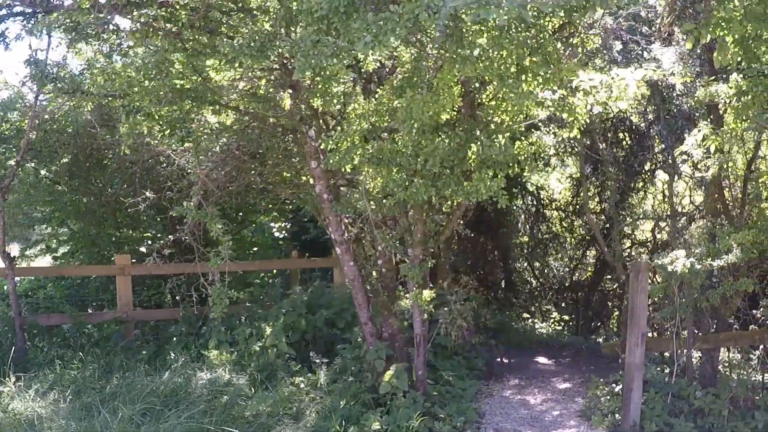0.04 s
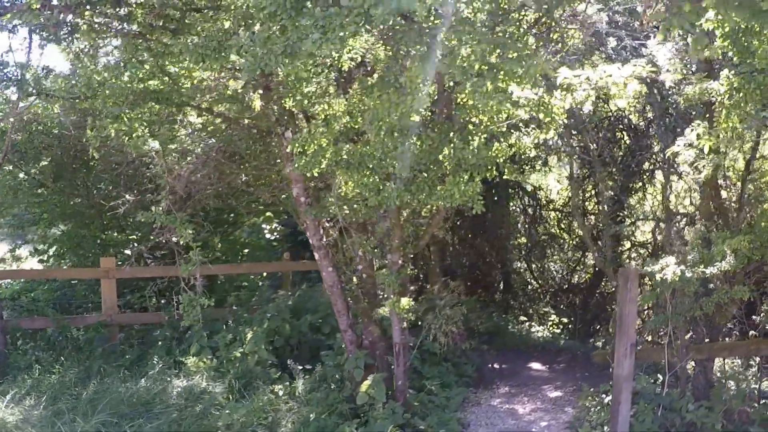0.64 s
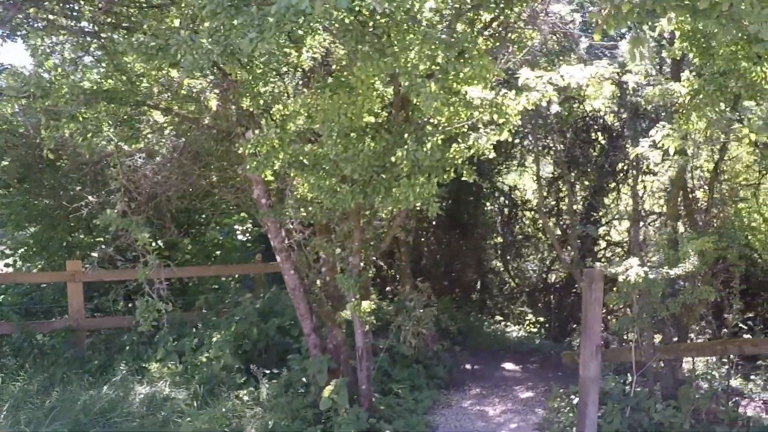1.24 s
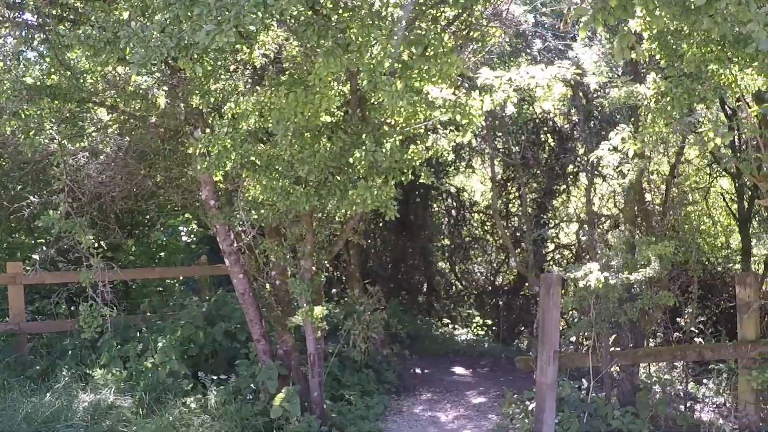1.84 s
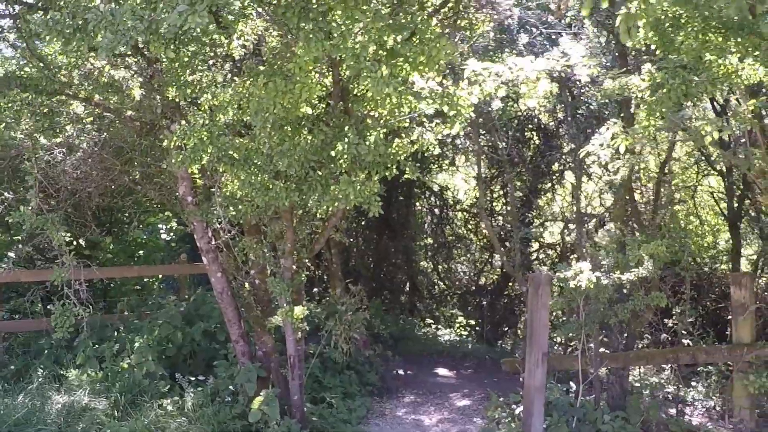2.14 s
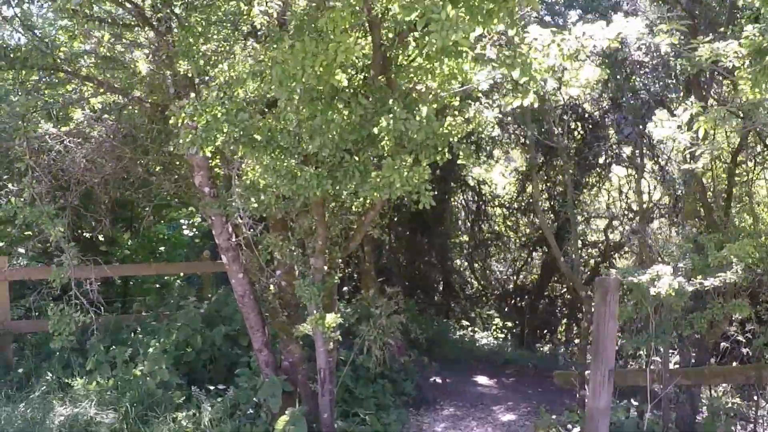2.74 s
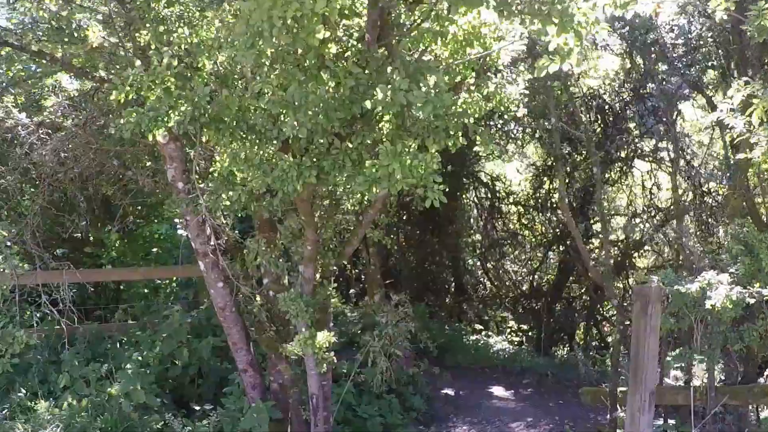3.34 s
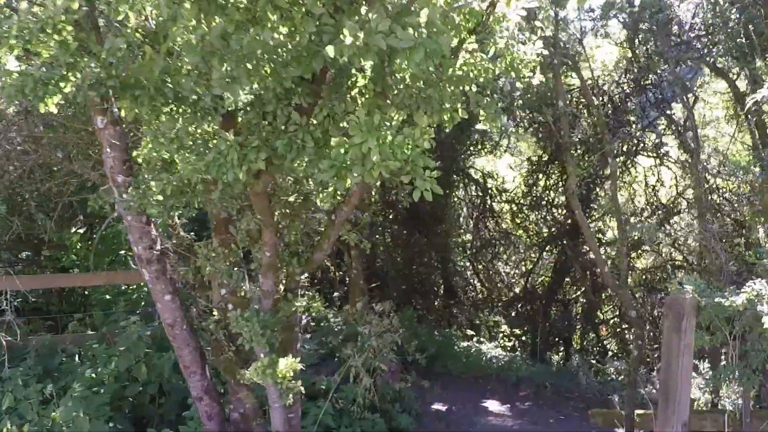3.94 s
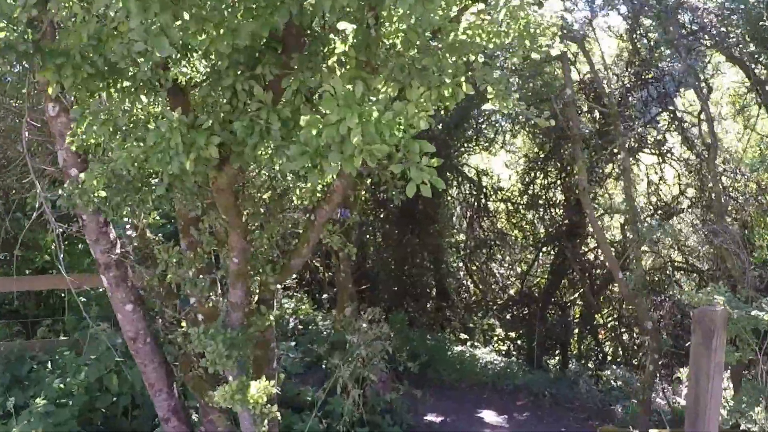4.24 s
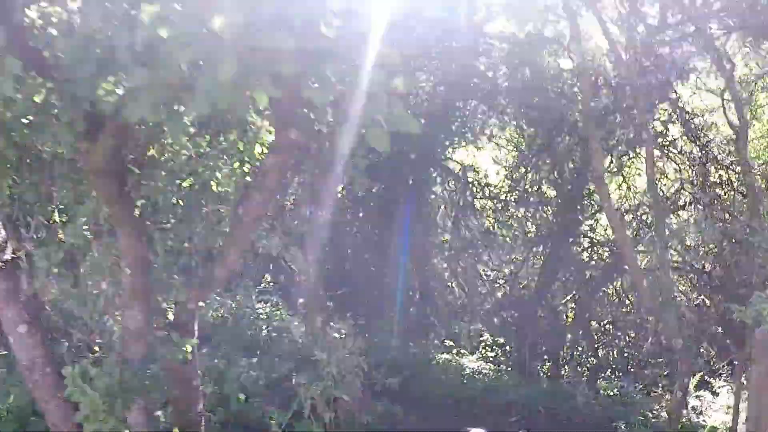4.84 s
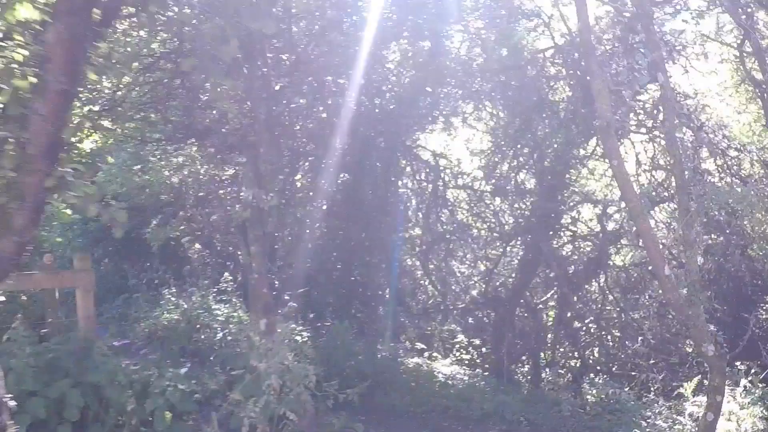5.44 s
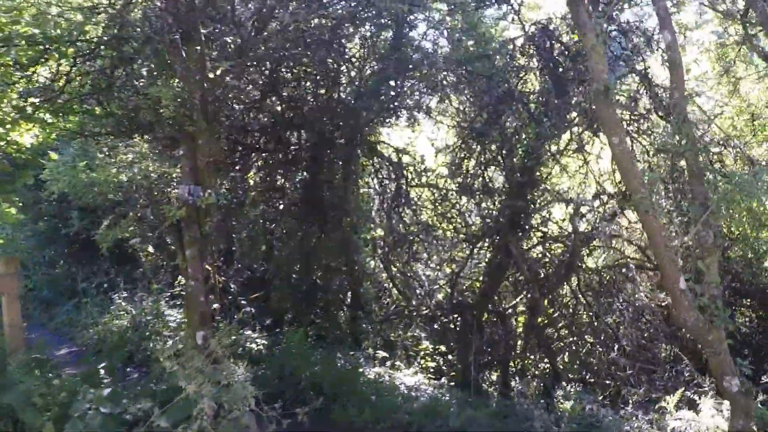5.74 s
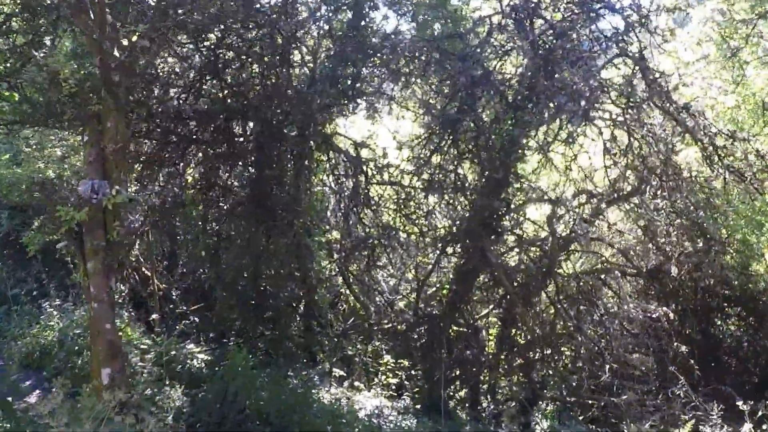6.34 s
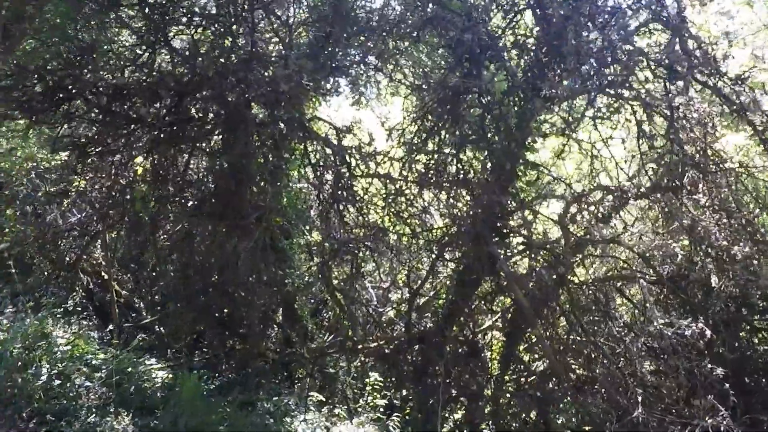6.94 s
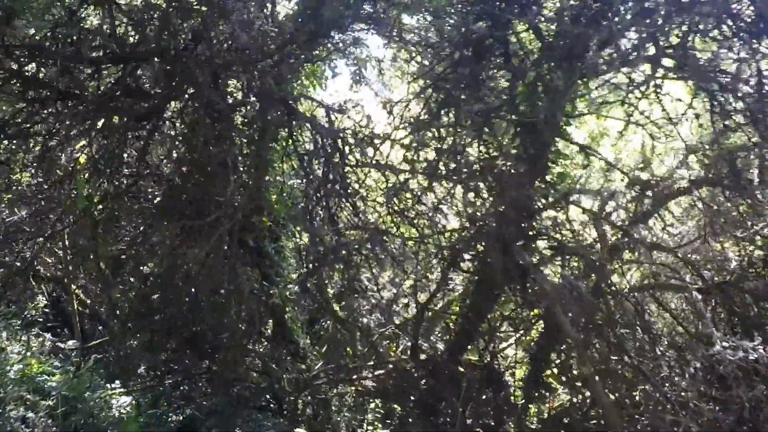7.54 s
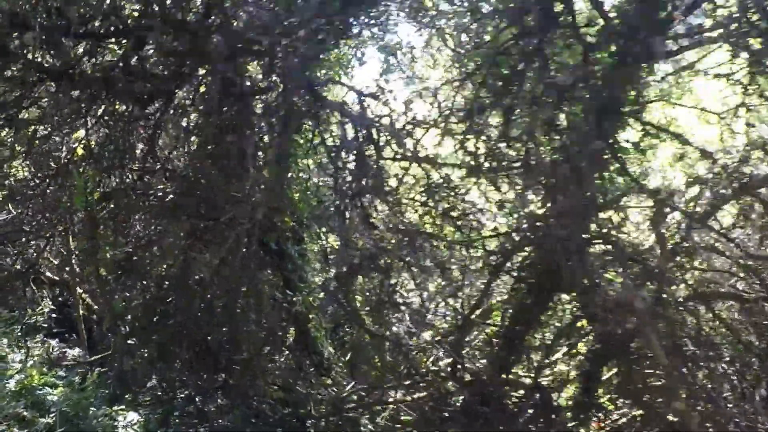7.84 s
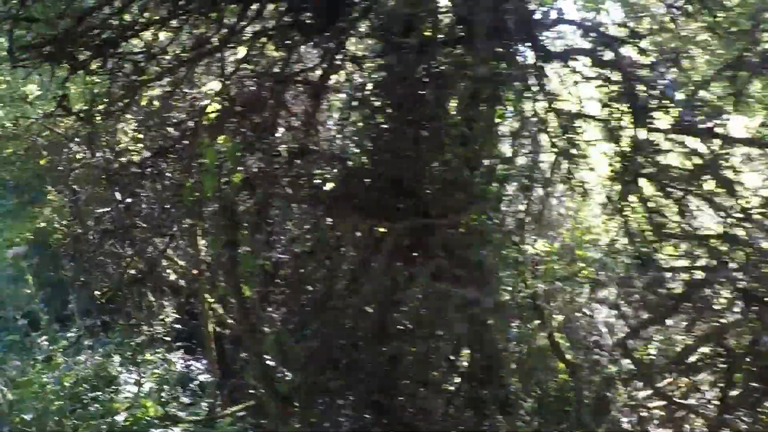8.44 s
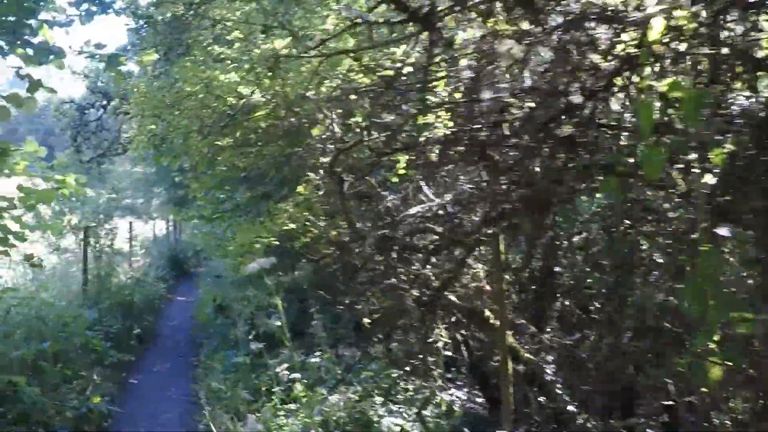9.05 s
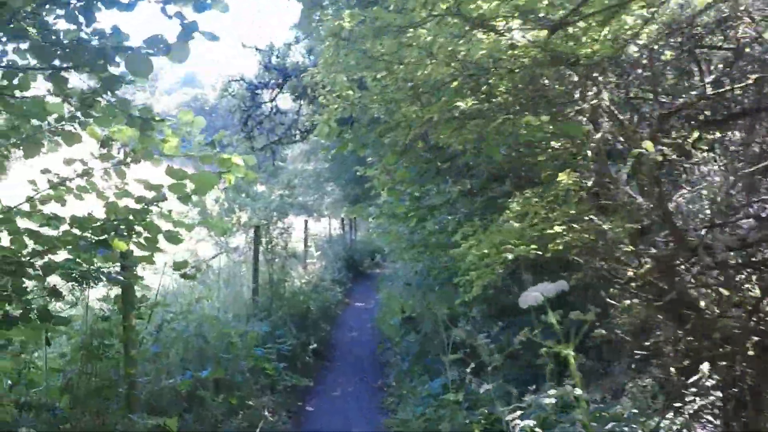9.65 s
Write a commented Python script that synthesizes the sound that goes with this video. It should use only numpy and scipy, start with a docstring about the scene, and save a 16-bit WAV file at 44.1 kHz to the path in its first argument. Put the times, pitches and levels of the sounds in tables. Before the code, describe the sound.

A bicycle rolls along a gravel and dirt path under trees, heard from a camera on board. The mount rumbles steadily, the tyres crunch grit and loose parts clack at bumps. Leaves brush past a few times and small birds whistle thinly. Midway the ground gets looser and stones snap and spit grit, then a gust thumps the microphone. The ride continues on packed ground with fewer clacks.

```python
"""A bicycle with a camera on board rolls along a gravel and dirt path under trees.
From the start the camera mount rumbles, the tyres crunch grit and loose parts clack at bumps.
Soon leaves brush past and small birds whistle thinly; both return later, and a few faint squeaks sound.
Midway the path gets looser and pinched stones spit grit. Near 5.5 s a gust thumps the microphone.
Then the path is packed again, and the ride goes on with fewer clacks."""
import sys
import numpy as np
from scipy import signal
from scipy.fft import rfft, irfft, next_fast_len
from scipy.io import wavfile
from scipy.ndimage import uniform_filter1d, map_coordinates

SR = 44100
rng = np.random.default_rng(int(sys.argv[2]) if len(sys.argv) > 2 else 0)


def unload_wav(signal):
    """Save mono or channel-first audio to the path in sys.argv[1] as 16-bit WAV at rate SR, clipped to [-1, 1]."""
    wavfile.write(
        sys.argv[1],
        SR,
        np.round(np.clip(np.atleast_2d(signal).T, -1, 1) * 32767).astype(np.int16),
    )


N = 426888  # samples, about 9.7 s


def amp(db):
    """Turn decibels into a gain; amp(-60 * t / fade_s) drops 60 dB in fade_s seconds."""
    return 10 ** (np.asarray(db) / 20)


def unit(x):
    """Scale a signal to an average strength (rms) of 1."""
    return x / np.sqrt(np.mean(x ** 2) + 1e-20)


def curves(rows):
    """Join rows of (time_s, values...) with straight lines: one curve for each value column."""
    times, *columns = np.transpose(rows)
    return [np.interp(np.arange(N) / SR, times, column) for column in columns]


def wobble(rate):
    """A smooth random curve through `rate` new values a second."""
    return map_coordinates(rng.standard_normal(int(N * rate / SR) + 4), [np.arange(N) * rate / SR])


def swell(middle_s, length_s):
    """A gain that rises and falls in a bell shape."""
    return np.exp(-np.minimum((2 * (np.arange(N) / SR - middle_s) / length_s) ** 2, 20))


def add(track, start_s, sound):
    """Mix a sound into the track."""
    room_left = track[max(round(start_s * SR), 0):][:len(sound)]
    room_left += sound[:len(room_left)]


def colour(x, spectrum, size=16384):
    """Shape the tone with a filter that follows rows of (frequency_hz, gain_db)."""
    hz, db = np.transpose(spectrum)
    gain = amp(np.interp(np.log(np.fft.rfftfreq(size, 1 / SR) + 1), np.log(hz), db))
    cepstrum = irfft(np.log(gain))
    cepstrum[1:size // 2] *= 2
    cepstrum[size // 2 + 1:] = 0  # so the filter rings only after a hit, never before
    return signal.fftconvolve(x, irfft(np.exp(rfft(cepstrum))))[:len(x)]


def noise(spectrum):
    """Steady noise with the given tone."""
    return unit(colour(rng.standard_normal(N + SR // 2), spectrum)[-N:])


def band(hz, width_hz):
    """Noise that rings around one pitch."""
    resonance = signal.iirpeak(hz, hz / width_hz, SR)
    return unit(signal.lfilter(*resonance, signal.lfilter(*resonance, rng.standard_normal(N))))


def grains(spectrum, rate, spread_db, bed_db):
    """Tiny hits of uneven size, `rate` a second, over a hissing bed of countless finer ones."""
    struck = rng.random(N) < rate / SR
    sizes = amp(spread_db * np.minimum(rng.standard_normal(N), 2)) * rng.choice([-1, 1], N)
    return unit(colour(unit(struck * sizes) + amp(bed_db) * rng.standard_normal(N), spectrum))


def patchy(x, depth_db):
    """Let the tone drift at random, in patches about 700 Hz wide and 60 ms long."""
    slices = signal.stft(x, nperseg=512)[2]
    drift = uniform_filter1d(rng.standard_normal(slices.shape), size=8, axis=0)
    drift = uniform_filter1d(drift, size=10, axis=1)
    return unit(signal.istft(slices * amp(depth_db * unit(drift)))[1][:N])


def birds():
    """Thin whistles glide and flutter; the farther the bird, the more the trees smear its note."""
    # whistles: start_s, length_s, start_hz, middle_hz, end_hz, level_db, direct_share (0-1)
    whistles = [(1.1, 0.12, 4150, 3680, 3980, -57, 0.1), (1.195, 0.11, 3500, 4030, 4760, -54, .05),
                (1.3, .1, 4770, 4170, 3600, -60, .05), (2.72, .1, 4200, 4700, 5300, -56, .35),
                (2.838, 0.071, 4180, 4700, 5280, -50, .6), (2.97, .09, 4270, 4830, 5400, -52, 0.66),
                (3.039, 0.34, 7800, 8140, 7840, -49, .6), (7.656, 0.3, 7880, 8100, 7930, -58, 0.6)]
    direct, scattered, t = np.zeros(N), np.zeros(N), np.arange(SR // 2) / SR
    quaver_hz = 170 * wobble(150)
    for start_s, length_s, start_hz, middle_hz, end_hz, level_db, direct_share in whistles:
        progress = np.linspace(0, 1, int(length_s * SR))
        hz = np.polyval(np.polyfit([0, .5, 1], [start_hz, middle_hz, end_hz], 2), progress)
        hz += (1 - direct_share) * quaver_hz[round(start_s * SR):][:len(hz)]
        arch = np.sqrt(np.abs(np.sin(np.pi * progress)))
        note = amp(level_db) * arch * np.sin(2 * np.pi * np.cumsum(hz) / SR)
        add(direct, start_s, direct_share * note)
        add(scattered, start_s, (1 - direct_share) * note)
    trees = rng.standard_normal(len(t)) * amp(-60 * t / .5)
    echo = signal.fftconvolve(scattered, trees / np.linalg.norm(trees))[:N]
    return direct * amp(2.7 * wobble(32)) + echo


def squeaks():
    """Short breathy notes, each a swell of noise around one high pitch."""
    # squeaks: middle_s, level_db, pitch_hz, width_hz, length_s
    notes = [(2.148, -48.5, 6100, 1300, 0.04), (6.441, -44, 4120, 400, 0.022),
             (9.442, -52, 7800, 2500, .025), (9.578, -53, 6760, 1980, 0.014)]
    t = np.arange(N) / SR
    return sum(amp(level_db) * np.exp(-(2 * (t - middle_s) / length_s) ** 2) * band(pitch_hz, width_hz)
               for middle_s, level_db, pitch_hz, width_hz, length_s in notes)


def rumble():
    """Rough ground shakes and sways the mount; the tyre tread drones, lower as the wheel slows."""
    # shaking of the mount and air on the microphone: time_s, level_db
    shake = [(0, -25), (.6, -28), (.9, -26), (1.3, -27.5), (2.4, -25.5), (4.4, -26), (5.0, -24.5),
             (6.0, -25.5), (6.5, -25), (7.3, -25), (7.9, -24), (8.3, -24.5), (8.82, -24), (9.2, -26.5),
             (9.68, -24.5)]
    # tone of the shaking: frequency_hz, gain_db
    shake_tone = [(10, 0), (22, 2), (35, 4), (55, -4), (80, -8), (125, -11.5), (200, -17.5), (300, -25.5),
                  (600, -43.5), (1500, -77.5)]
    # drone of the rolling tread: time_s, pitch_hz, level_db
    tread = [(0, 53.2, -52), (1.2, 54, -36), (2.3, 52.1, -30), (2.75, 50.9, -22.5), (3.1, 52.1, -31.5),
             (3.4, 48.76, -35), (4.1, 44.77, -25.5), (4.7, 40.2, -43), (5.2, 40, -57)]
    shake_db, = curves(shake)
    tread_hz, tread_db = curves(tread)
    drone = np.sqrt(2) * np.sin(2 * np.pi * np.cumsum(tread_hz) / SR + 0.56 * wobble(22))
    shaking = noise(shake_tone)
    deep = signal.sosfiltfilt(signal.butter(4, 52, fs=SR, output="sos"), shaking)  # below 52 Hz
    sway = amp(0.99 * (shake_db - shake_db.mean()) - 0.9)  # hard shaking boosts the deep part
    mount = amp(shake_db + 2.5 + 1.24 * wobble(7.8)) * (shaking - deep + sway * deep)
    return mount + amp(tread_db) * drone


def thumps():
    """A jolt or a gust hits the microphone with a short burst of low noise."""
    # low thumps: middle_s, level_db, highest_hz, length_s
    bursts = [(2.438, -14.5, 44.6, 0.042), (5.382, -14, 196, 0.047), (5.466, -11.5, 109, 0.078),
              (5.532, -12, 114, 0.037), (5.631, -16.5, 74.4, 0.057)]
    track = np.zeros(N)
    for middle_s, level_db, highest_hz, length_s in bursts:
        shape = swell(middle_s, length_s)
        low_band = signal.butter(3, [highest_hz / 4, highest_hz], "bandpass", fs=SR, output="sos")
        eddies = signal.sosfilt(low_band, rng.standard_normal(N))
        track += amp(level_db) * unit(shape * eddies) * np.sqrt(np.mean(shape ** 2))
    return track


def leaves():
    """Each brush past leaves is a shower of tiny slips: stems scrape low and ring, blades swish high."""
    # brushes: start_s, rise_s, hold_s, fall_s (for each 20 dB), scrape_db, swish_db
    brushes = [(.73, .115, .03, .18, -23.8, -31.5), (2.435, .045, .025, .05, -30, -38),
               (3.402, .022, .022, .07, -23.5, -28), (6.778, .035, .035, .1, -33, -27.5)]
    # stems ringing in each brush: low_hz, low_db (against the scrape), high_hz, high_db (against the swish)
    stems = [(554, -10, 2900, -11.5), (1601, -12, 2500, -13), (594, -5.5, 9300, -19),
             (1470, -6.5, 5450, -8)]
    # tones of the scrape and the swish: frequency_hz, gain_db
    scrape_tone = [(100, -7.5), (250, -6.5), (400, -2), (680, -4.5), (900, -17.5), (1300, -13.5),
                   (2000, -33.5), (3000, -36), (6000, -50)]
    swish_tone = [(1000, 2.5), (2200, -6), (3000, -3), (4300, -6), (5600, -4), (7300, 1.5), (9000, -1),
                  (11500, -13.5), (15000, -18)]
    track, t = np.zeros(N), np.arange(N) / SR
    flicker = amp(1.63 * wobble(70))
    scrape = grains(scrape_tone, rate=500, spread_db=11.5, bed_db=-7)
    swish = patchy(grains(swish_tone, rate=1500, spread_db=3.5, bed_db=-3), depth_db=1.5)
    for brush, (low_hz, low_db, high_hz, high_db) in zip(brushes, stems):
        start_s, rise_s, hold_s, fall_s, scrape_db, swish_db = brush
        rise = np.clip((t - start_s) / rise_s, 0, 1)
        pressure = rise * amp(-20 * np.clip((t - start_s - rise_s - hold_s) / fall_s, 0, 10))
        low_ring = amp(low_db) * band(low_hz, width_hz=0.43 * low_hz)
        high_ring = amp(high_db) * band(high_hz, width_hz=1800)
        track += amp(scrape_db) * pressure ** 1.55 * (scrape + low_ring)  # grows faster than the swish
        track += amp(swish_db) * pressure * (swish + high_ring)
    return flicker * track


def rattles(rate=2, level_db=-40, centre_hz=1410, fade_s=0.0031):
    """Rows for faint extra clacks at random moments, `rate` a second."""
    draws = rng.random((int(rate * N / SR), 2))
    return [(when * N / SR, level_db, centre_hz * 2 ** (pitch - .5), fade_s) for when, pitch in draws]


def clacks():
    """A loose part knocks: three tones die fast, with a crack and a brief shiver of the frame."""
    # knocks of loose parts: start_s, level_db, pitch_hz, fade_s
    knocks = [(.452, -31, 760, 0.0051), (.553, -34, 1280, .012), (.693, -25.5, 1400, .007),
              (.863, -21, 686, .006), (.909, -18, 1360, 0.0046), (1.083, -26.5, 1510, 0.015),
              (1.127, -31.5, 1800, 0.022), (1.544, -30.5, 1355, 0.0098), (1.609, -32, 1460, 0.0087),
              (2.139, -20, 1297, 0.0072), (2.226, -26.5, 1280, .02), (2.444, -15, 1400, 0.0075),
              (2.466, -20, 1710, 0.0092), (2.506, -18.5, 1200, 0.017), (2.693, -21, 1256, 0.003),
              (3.156, -20, 1040, .012), (3.337, -22, 1250, 0.0094), (3.439, -16.5, 1065, 0.017),
              (3.543, -21, 1066, 0.019), (4.157, -23.5, 1070, 0.0091), (4.252, -20.5, 1268, 0.0076),
              (4.829, -15, 1070, 0.0049), (5.117, -18.5, 1280, 0.0098), (5.18, -22.5, 1510, 0.005),
              (5.471, -30, 850, .02), (5.545, -24, 1210, .004), (5.613, -16, 1110, 0.0063),
              (5.835, -23, 1040, 0.015), (5.922, -26, 1350, .005), (6.05, -24.5, 510, 0.018),
              (6.5, -27, 1400, 0.0048), (7.181, -27.5, 1000, .006), (7.351, -24.5, 1420, 0.0061),
              (7.431, -31, 1840, 0.0085), (9.25, -23.5, 2420, 0.0087), (9.448, -30, 1310, 0.005)]
    # tone of the crack and shiver: frequency_hz, gain_db
    frame_tone = [(200, -18), (500, 2.5), (1300, 11.5), (2400, 1), (3500, -7), (6500, -13), (10000, -29)]
    rings, jolts, t = np.zeros(N), np.zeros(N), np.arange(SR // 8) / SR
    onset = 1 - np.exp(-(t / .0008) ** 2)
    crack, shiver = amp(-7 - 60 * t / 0.01), amp(-15 - 60 * t / 0.11)
    for start_s, level_db, pitch_hz, fade_s in list(knocks) + rattles():
        phase = 2 * np.pi * pitch_hz * t
        ratio, overtone_db = rng.uniform([1.3, -8], [2, -2])
        ring = onset * np.sin(phase) * amp(-60 * t / fade_s)
        overtone = onset * np.sin(ratio * phase) * amp(overtone_db - 60 * t / 0.0036)
        undertone = np.sin(0.42 * phase) * amp(-6 - 60 * t / 0.0069)
        knock = ring + overtone + undertone
        add(rings, start_s, amp(level_db) * knock / np.abs(knock).max())
        add(jolts, start_s, amp(level_db) * onset * (crack + shiver))
    return rings + jolts * patchy(noise(frame_tone), depth_db=5)


def spits():
    """The tyre pinches a stone: a sharp snap, then a spray of grit that swells and fades."""
    # pinched stones: start_s, snap_db, spray_db
    pinches = [(1.127, -37, -55), (3.236, -31, -36.5), (3.623, -21, -34), (3.774, -19, -39),
               (3.863, -26.5, -46), (4.057, -34, -31.5), (4.079, -27, -40), (4.252, -31, -34),
               (4.829, -42, -30.5), (4.913, -47, -34), (5.117, -31, -34), (5.419, -13.5, -23),
               (5.615, -30, -37), (5.779, -35.5, -39), (6.036, -32, -41), (7.034, -24, -45),
               (8.961, -35, -47)]
    # tones of the snap and the spray: frequency_hz, gain_db
    snap_tone = [(2000, -16), (4000, -6), (7500, 5), (10000, 3), (12000, -9), (15000, -11)]
    spray_tone = [(2000, -4), (4000, -4.5), (6000, 0.5), (7500, 5.5), (9500, -6), (11500, -27),
                  (15000, -10)]
    snaps, flow, t = np.zeros(N), np.zeros(N), np.arange(SR // 4) / SR
    for start_s, snap_db, spray_db in pinches:
        snap = colour(rng.standard_normal(len(t)) * amp(-60 * t / .006), snap_tone, size=2048)
        add(snaps, start_s, amp(snap_db) * snap / np.abs(snap).max())
        add(flow, start_s, amp(spray_db - 60 * t / 0.094) * (1 - np.exp(-t / 0.0029)))
    spray = patchy(grains(spray_tone, rate=4400, spread_db=10, bed_db=5), depth_db=0)
    return snaps + flow * spray


def pebbles(rate, centre_hz, scatter, cycles):
    """Pebbles click together, each at its own pitch, fading 60 dB over `cycles` vibrations."""
    count = int(rate * N / SR)
    starts = (rng.random(count) * N).astype(int)
    pitch = np.clip(rng.standard_normal((count, 2)), -2, 2)[:, :1]
    step = np.arange(SR // 80)
    turns = centre_hz * np.exp(scatter * pitch) * step / SR
    clicks = amp(-60 * turns / cycles) * np.sin(2 * np.pi * turns) * (1 - np.exp(-turns))
    places = starts[:, None] + step
    return unit(np.bincount(places.ravel(), clicks.ravel(), N)[:N])  # sum overlapping clicks


def surface():
    """Levels of dirt, stones and grit: loose patches add to the path, and the dirt follows the stones."""
    # the path, packed at both ends and looser midway: time_s, stone_db, grit_db
    path = [(0, -52.5, -55.5), (.45, -51.5, -61.5), (1.05, -46.5, -52.5), (1.35, -54, -64.5),
            (2.25, -52, -56.5), (2.5, -43, -45.5), (3.05, -52.5, -60.5), (3.5, -48.5, -46.5),
            (4.35, -48.5, -50.5), (5.02, -49.5, -51), (5.6, -45.5, -49.5), (6.3, -48.5, -52),
            (6.75, -49, -56), (7.65, -53.5, -58.5), (8.2, -51, -56.5), (9.68, -53, -57.5)]
    # patches of loose gravel, plus one burst of crunch at 2.38 s as the second brush past leaves begins:
    # middle_s, length_s, stone_db, grit_db
    patches = [(0.667, 0.15, -50.5, -48.5), (2.384, 0.12, -41.5, -51), (2.663, 0.15, -50, -47.5),
               (2.808, 0.075, -43, -50), (3.003, 0.037, -44.5, -63), (3.272, 0.3, -46, -65),
               (3.929, 0.18, -44, -60), (4.054, 0.09, -47.5, -42), (4.289, 0.087, -41, -41.5),
               (4.445, 0.19, -47, -50), (4.78, 0.12, -44, -50), (4.916, 0.09, -51, -43.5),
               (5.375, 0.16, -50, -41.5), (5.77, .07, -62, -68), (5.922, 0.027, -41, -54),
               (6.048, .06, -46.5, -45), (6.196, 0.17, -62, -49), (6.502, 0.19, -48, -52.5),
               (7.023, 0.12, -68, -45.5), (7.25, 0.22, -49, -51.5), (7.9, 0.2, -48.5, -61),
               (8.505, 0.14, -55, -50), (8.978, 0.061, -62, -45.5), (9.27, 0.24, -50.5, -50)]
    stone_power, grit_power = amp(curves(path)) ** 2
    for middle_s, length_s, stone_db, grit_db in patches:
        crossing = swell(middle_s, length_s)
        stone_power += (amp(stone_db) * crossing) ** 2
        grit_power += (amp(grit_db) * crossing) ** 2
    stone_db, grit_db = 10 * np.log10([stone_power, grit_power])
    dirt_db = -41.5 + 0.54 * (stone_db - stone_db.mean())
    return dirt_db, stone_db, grit_db


def tyres():
    """Under the tyres dirt roars, stones crunch and grit sizzles; each small bump presses on all three."""
    # tones of dirt, stones and fine grit: frequency_hz, gain_db
    dirt_tone = [(100, -22), (220, 1.5), (330, 0), (500, -4), (750, -8.5), (1000, -13.5), (1500, -33),
                 (3000, -43)]
    stone_tone = [(500, -9), (850, -3), (1300, -1), (1700, -3.5), (2050, -4.5), (2450, -5), (3200, -12.5),
                  (4400, -7), (7000, -29.5)]
    grit_tone = [(1500, -24), (2500, -9), (3400, -8.5), (4400, -4), (5500, -2.5), (6300, -0.5), (7300, 2),
                 (8300, -3), (9500, -3.5), (11300, -12.5), (15000, -28)]
    dirt_db, stone_db, grit_db = surface()
    bumps = wobble(28)
    dirt = amp(dirt_db + 0.73 * bumps) * grains(dirt_tone, rate=500, spread_db=3, bed_db=1)
    crunch = amp(-1.5) * patchy(grains(stone_tone, rate=400, spread_db=7, bed_db=4), depth_db=2)
    stony = amp(0.93 * (stone_db - stone_db.max()))  # pebbles click loudest where the path is roughest
    clicks = stony * amp(0.5) * pebbles(rate=170, centre_hz=1382, scatter=0.23, cycles=21)
    stones = amp(stone_db + 1.46 * bumps) * (crunch + clicks)
    clumps = amp(1.45 * wobble(110))  # grit gives way in little bursts
    sizzle = patchy(grains(grit_tone, rate=380, spread_db=3.5, bed_db=7.5), depth_db=1.5)
    grit = amp(grit_db + 1.5 * bumps) * clumps * sizzle
    return dirt + stones + grit


def scene():
    """All sounds meet at the camera; a faint blurred copy sets left and right apart, mostly up high."""
    # stereo width, as the gain of the blurred copy: frequency_hz, gain_db
    width = [(25, -58), (100, -58), (350, -37), (1400, -40.5), (5600, -28.5), (10000, -17), (11300, -20),
             (12000, -1), (15000, 2)]
    mid = rumble() + tyres() + leaves() + clacks() + spits() + thumps() + birds() + squeaks()
    slices = signal.stft(mid, nperseg=256)[2]
    blurred = signal.istft(slices * np.exp(2j * np.pi * rng.random(slices.shape)))[1][:N]
    side = colour(blurred, width)
    return np.array([mid + side, mid - side])


def record(dry):
    """The camera keeps nothing above its highest frequency."""
    highest_hz = 15400
    size = next_fast_len(N + SR // 2)
    kept = np.fft.rfftfreq(size, 1 / SR) < highest_hz
    return irfft(rfft(dry, size) * kept, size)[:, :N]


dry = scene()
out = record(dry)
unload_wav(out)
```